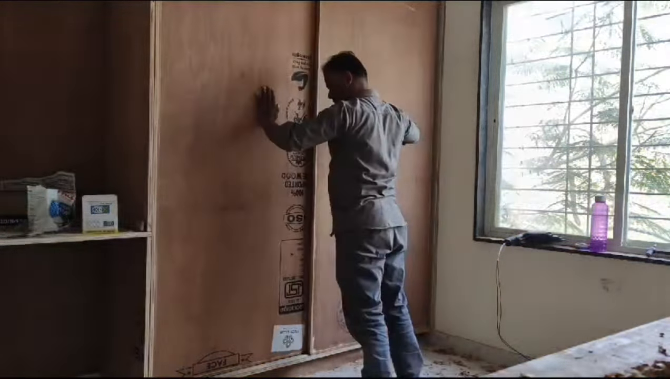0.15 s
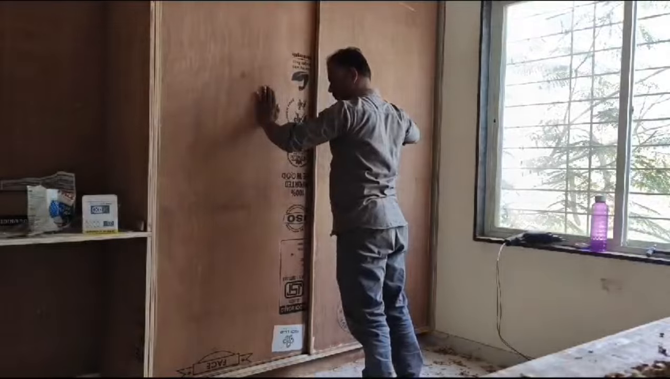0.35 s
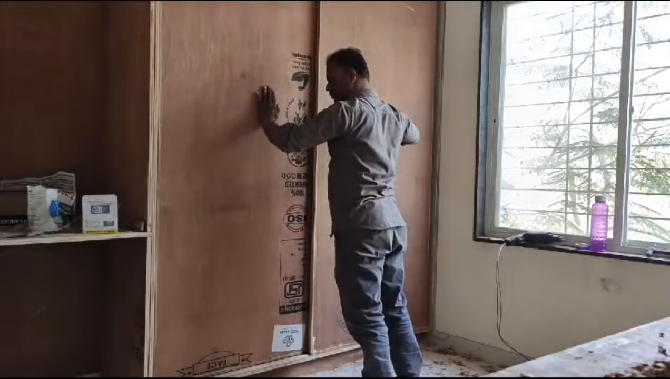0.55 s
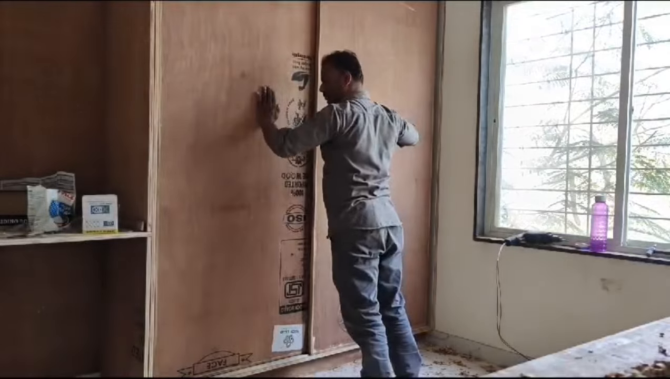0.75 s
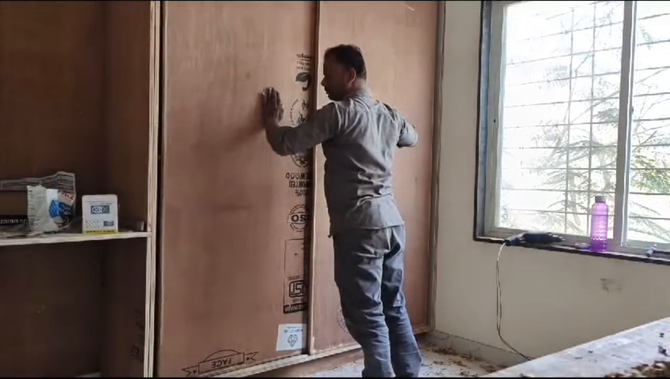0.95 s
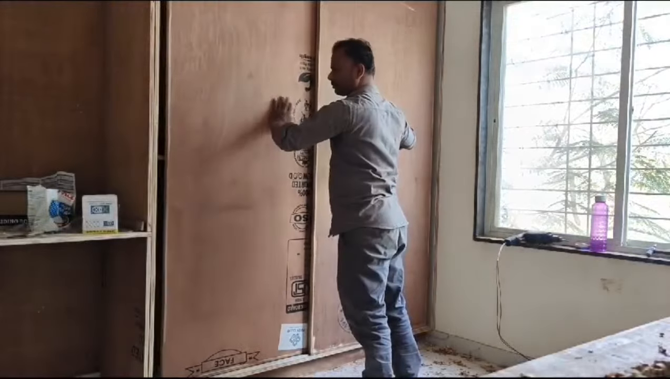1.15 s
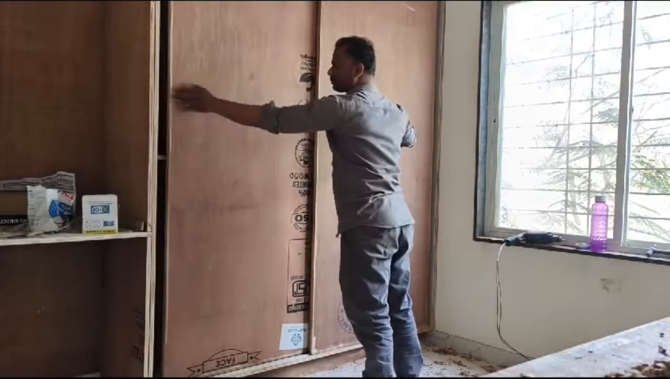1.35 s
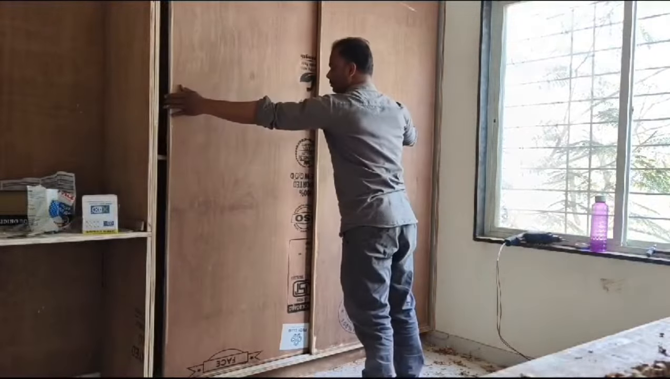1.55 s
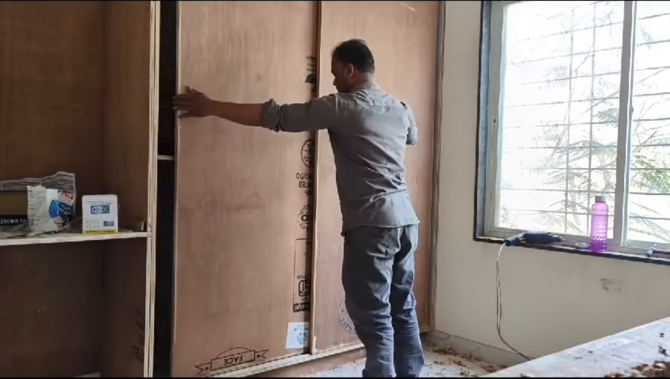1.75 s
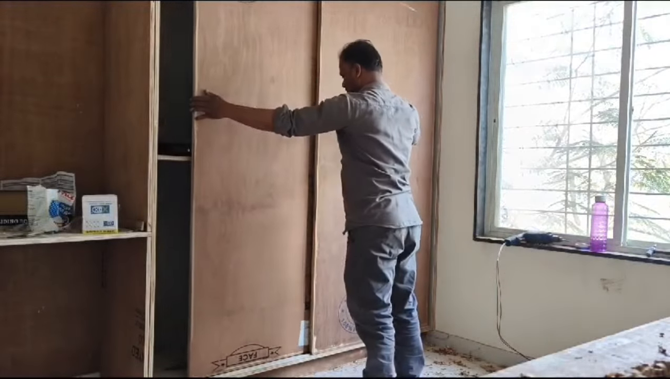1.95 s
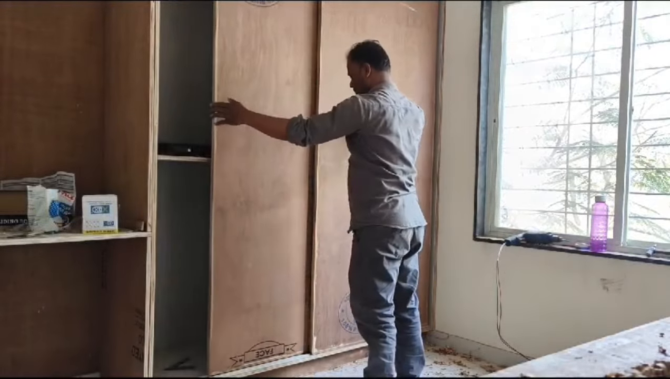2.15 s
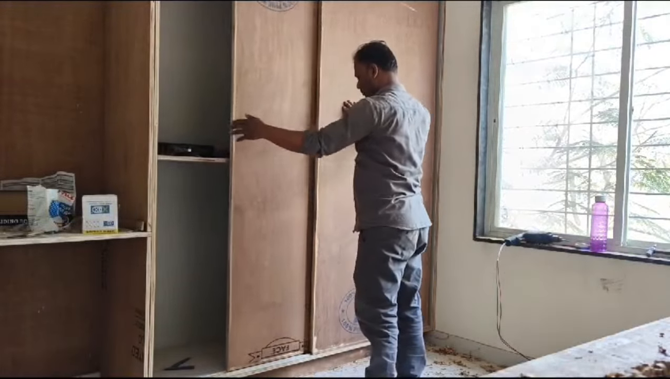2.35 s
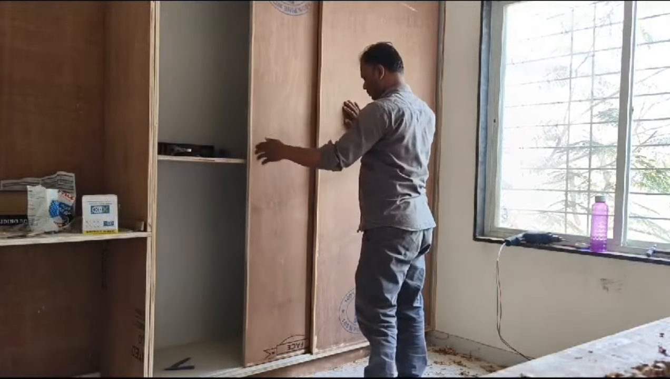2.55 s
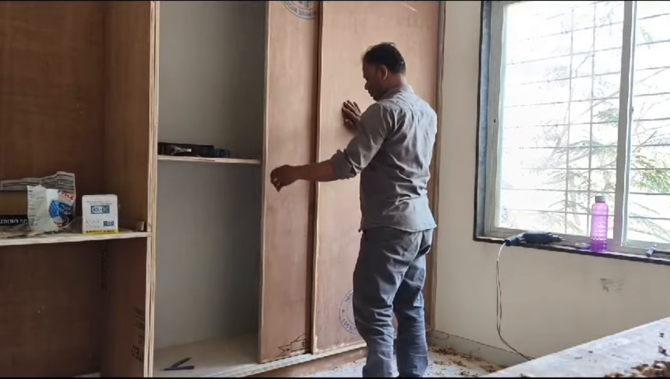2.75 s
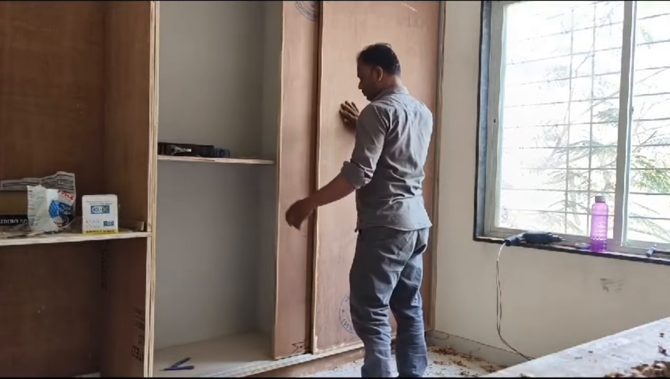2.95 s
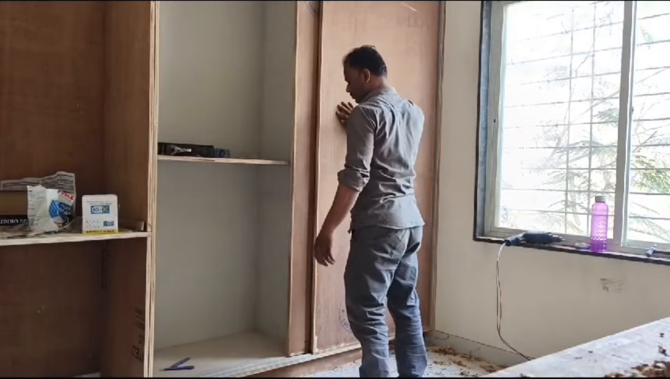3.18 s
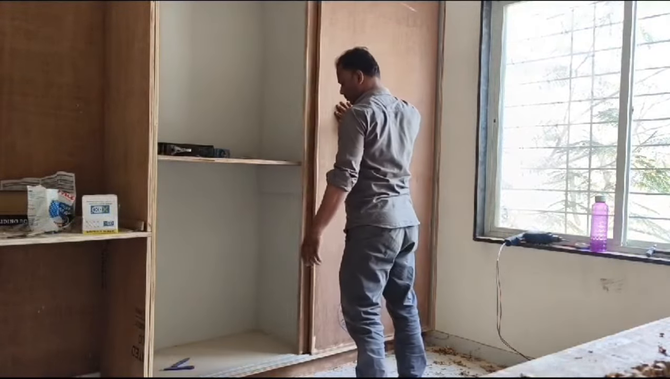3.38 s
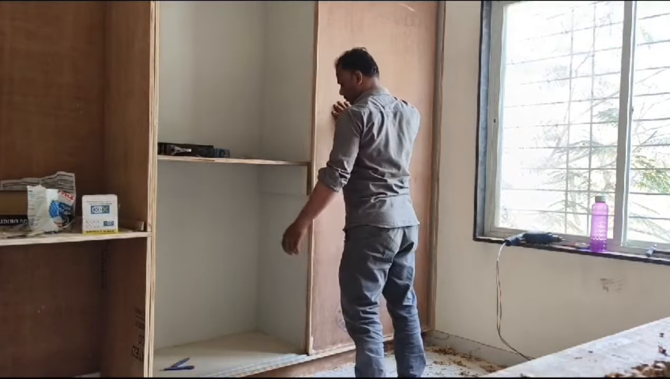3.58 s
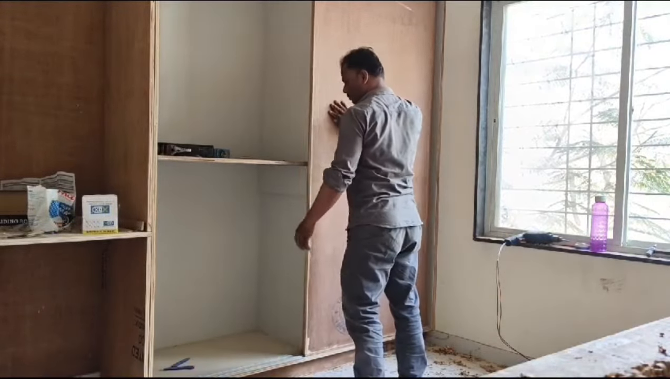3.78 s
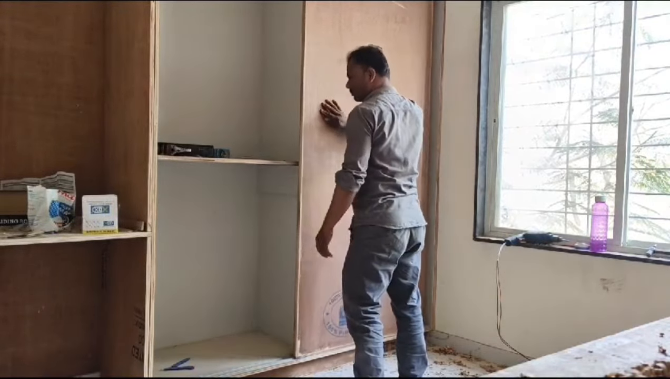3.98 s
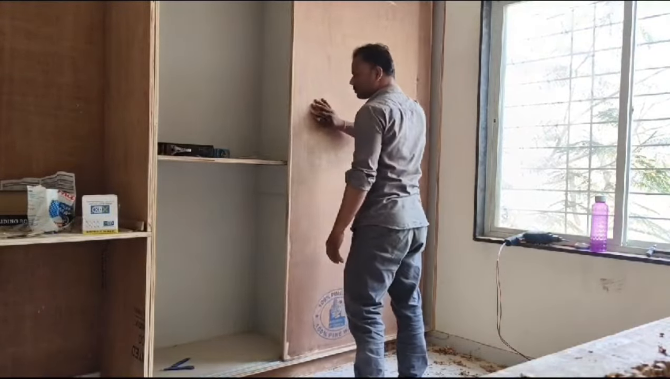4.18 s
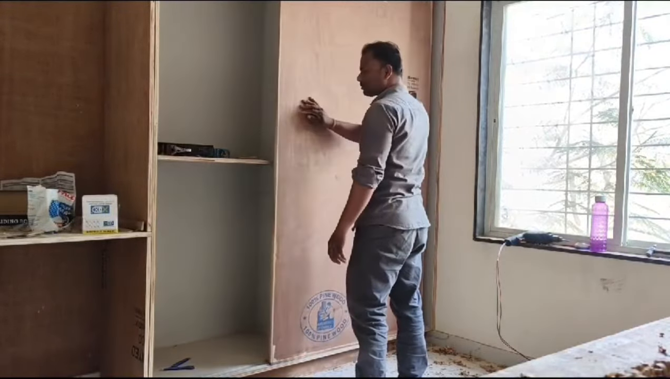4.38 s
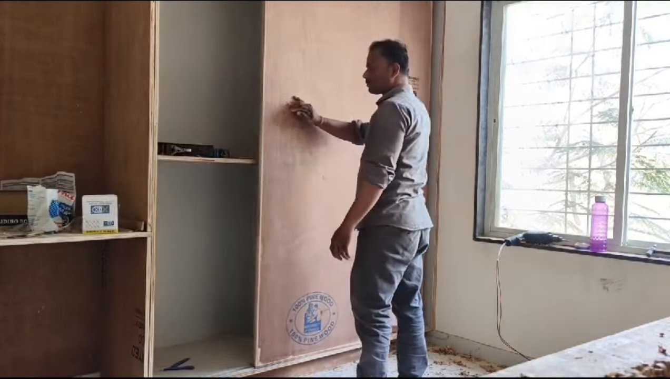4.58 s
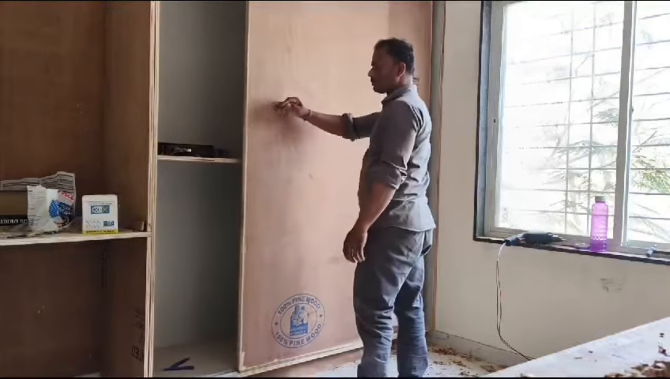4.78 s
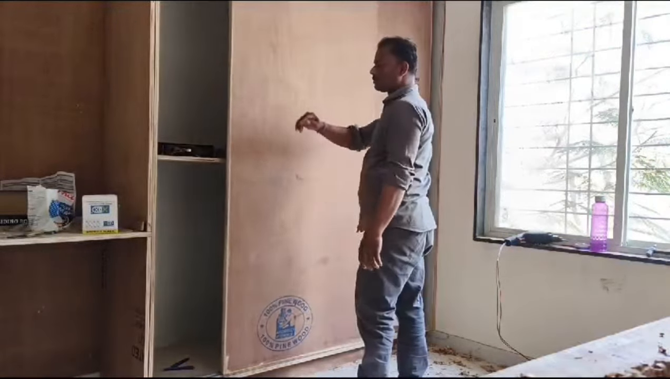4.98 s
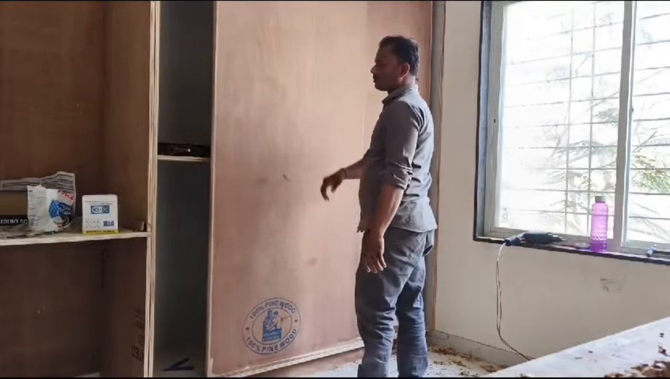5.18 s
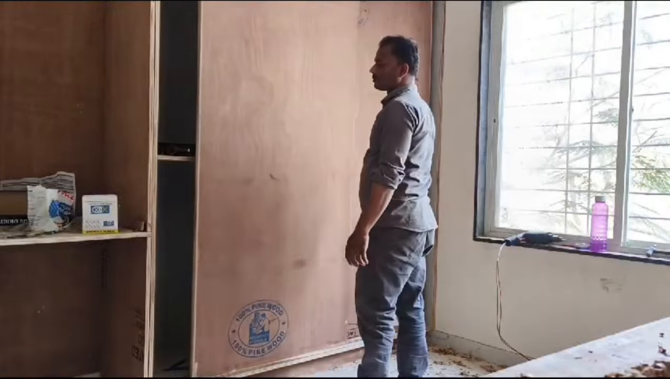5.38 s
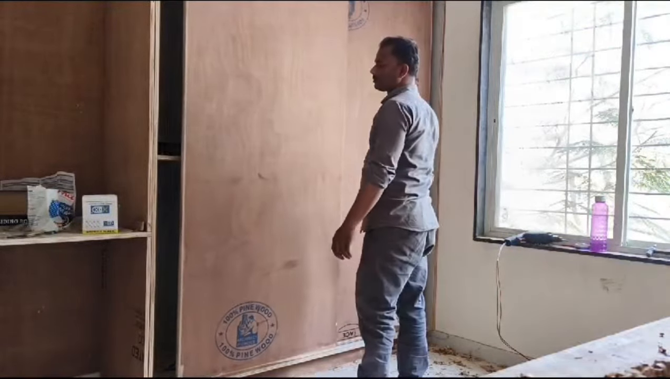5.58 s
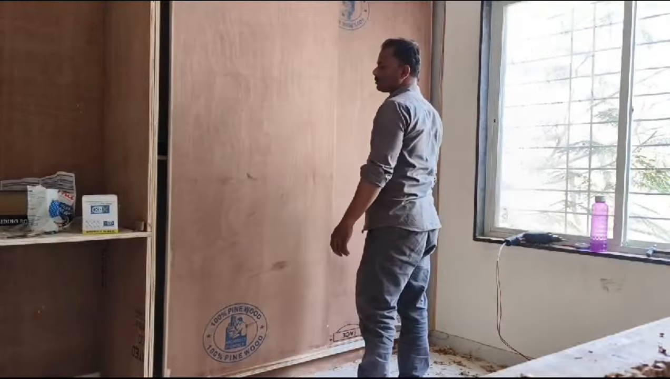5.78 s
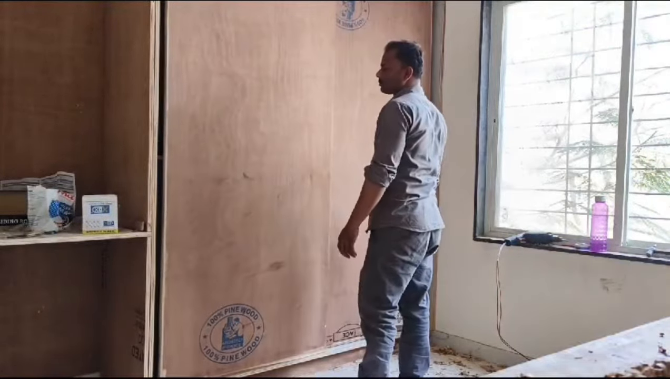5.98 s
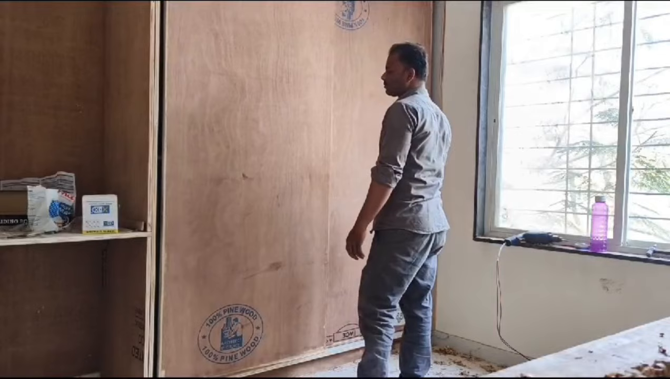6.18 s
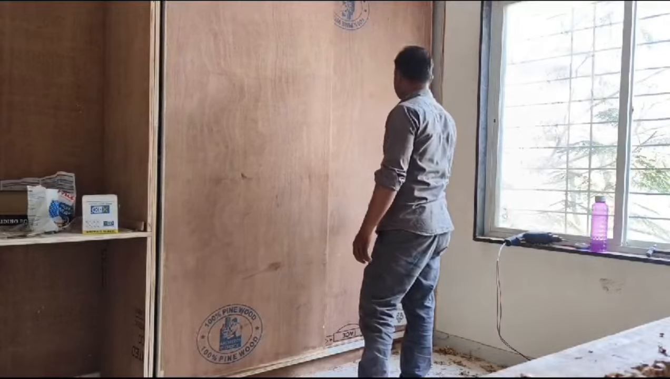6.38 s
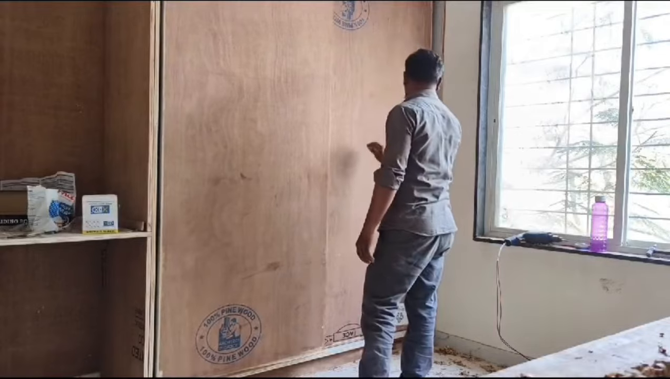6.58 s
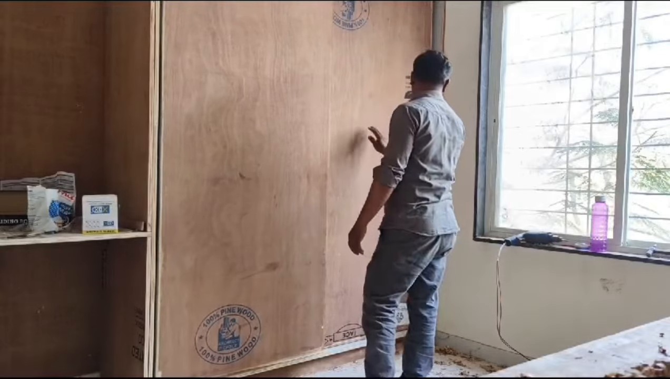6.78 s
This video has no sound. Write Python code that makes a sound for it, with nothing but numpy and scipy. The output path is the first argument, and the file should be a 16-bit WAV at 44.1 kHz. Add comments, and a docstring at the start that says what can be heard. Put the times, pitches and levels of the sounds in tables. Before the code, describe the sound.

A hard, empty room with close to a second of echo. Low rolling is audible at the start; from 0.1 to 0.6 s a small board drags across wood with a coarse, briefly singing scrape, then taps quickly two or three times until 0.7 s. Around 1.1-1.4 s there is light rattling, gritty hiss and palm brushing; two hand knocks land at 1.5 and 1.6 s over a deep rumble. The door rolls from about 2 s, hum surging, with soft bumps near 2.45 s and a firmer knock at 2.75-2.85 s, booming strongest near 2.9 s. A small thump at 3.3 s precedes the loudest wooden bang, a cluster at 3.8-4.0 s with a low ringing thud. Heavy rolling follows until 4.8 s, then fades to faint rattling and a tiny squeak at 5 s. At 6.1 s a moderate closing knock and small metal click resonate, with a brief low rumble dying away by 6.8 s.

```python
"""A bare, echoing room where plywood wardrobe doors roll along a metal track.
Uneven rollers shake the panels: filtered noise booms, drums and rattles over a wavering hum.
Grit, palms and a dragged board hiss and scrape as shaped noise, partly through ringing wood or track.
Hands, stops, board taps and a metal click are noise bursts with dying echoes; sines thud and ring on.
A deep rumble comes and goes. Two microphones hear the bass alike and the treble unlike."""
import sys
import numpy as np
from scipy import signal
from scipy.fft import rfft, irfft, next_fast_len
from scipy.io import wavfile
from scipy.ndimage import uniform_filter1d

SR = 44100
rng = np.random.default_rng(int(sys.argv[2]) if len(sys.argv) > 2 else 0)


def amp(db):
    return 10 ** (np.asarray(db, float) / 20)


def int16_out(signal):
    """Quantize to a 16-bit WAV file."""
    q = np.round(np.clip(np.atleast_2d(signal).T, -1, 1) * 32767)
    wavfile.write(sys.argv[1], SR, q.astype(np.int16))


N = 301644
T = np.arange(N) / SR
SIZE = next_fast_len(N + SR)
HZ = np.fft.rfftfreq(SIZE, 1 / SR)

# Knocks on the doors, ahead of the trims: [t/s, slap level/dB,
# slap slope above its knee/(dB per octave), push level/dB, push f/Hz]
KNOCKS = [(0.0, -50, 0.5, -39, 216), (1.514, -27, -5.5, -58, 86), (1.611, -31, -6.5, -42, 80),
          (2.423, -39, -4, -70, 80), (2.468, -44, -6, -33, 89), (2.753, -24.5, -8.5, -28.5, 780),
          (2.844, -29, -33, -30.5, 201), (3.331, -36, -6, -35.5, 81), (3.817, -36, 0.5, -24, 72.5),
          (3.86, -23.5, 1.5, -18, 101), (3.89, -20, -22.5, -28.5, 233), (3.984, -15.5, -13.5, -15.5, 480),
          (3.995, -18, -27.5, -11.5, 186), (6.099, -37.5, 1, -37, 100), (6.114, -29.5, -6, -31, 73.5),
          (6.163, -30, -6.5, -33.5, 252),]
# Door panel modes: [f/Hz, width/Hz, level over the flat path/dB]
PANEL = [(54, 20, 5.5), (80, 31, 11), (126.2, 11.6, 8), (195.7, 14.6, 9.5), (228, 16.3, 10.5),
         (418.4, 20, -3), (998, 30, -6.5), (1064, 51, 1), (1990, 480, -5), (2807, 300, -4),
         (5030, 400, 0.5)]
# Modes of the small board: [f/Hz, width/Hz, level over a flat path of gain 1/dB]
BOARD = [(340, 75, 26), (518, 86, 24.8), (1380, 410, 17.5), (2287, 116, 28.6), (2560, 240, 24.8),
         (4200, 130, 16)]
# Decay of the room's echoes: [f/Hz, t60/s]
ROOM = [(50, 0.83), (120, 0.44), (250, 1), (1000, 0.79), (2500, 0.66), (5000, 0.48), (10000, 0.32),
        (15000, 0.15)]


def evened(x):
    """Scales to rms 1."""
    return x / np.sqrt(np.mean(x ** 2) + 1e-20)


def read(points, hz):
    """Reads a table on a log-frequency axis."""
    f, value = np.transpose(points)
    return np.interp(np.log(hz + 1), np.log(f + 1), value)


def curve(rows):
    """Columns of a table over time; the ends hold."""
    s, *columns = np.transpose(rows)
    return [np.interp(T, s, column) for column in columns]


def swells(rows):
    """Summed power of smooth humps: start s, length s, peak level dB."""
    return sum(amp(2 * db) * np.sin(np.pi * np.clip((T - s) / length, 0, 1)) ** 2
               for s, length, db in rows)


def filtered(x, response):
    """Multiplies the spectrum by a response."""
    return irfft(rfft(x, SIZE) * response, SIZE)[..., :N]


def resonance(hz, width):
    """Causal response of one mode, with gain 1 at its pitch."""
    return 1 / (1 + 2j * (HZ - hz) / width)


def ringing(modes):
    """Causal response of a struck or rubbed body: a flat path plus one resonance a mode."""
    return 1 + sum(amp(db) * resonance(hz, width) for hz, width, db in modes)


def noise(colour, lumps_db=0., lump_s=.01):
    """Two unlike paths through the room, sharing one lumpy level; rms 1."""
    lumps = evened(uniform_filter1d(rng.standard_normal(N), int(lump_s * SR)))
    hiss = rng.standard_normal((2, N))
    return evened(filtered(hiss, colour) * amp(lumps_db * lumps))


def streaky(x, patchy_db):
    """Narrow resonances flare and fade at random as the contact point moves."""
    z = signal.stft(x, nperseg=512, noverlap=384)[2]
    field = rng.standard_normal(z.shape[1:])
    field = uniform_filter1d(field, 3, axis=0)  # bins
    field = evened(uniform_filter1d(field, 14, axis=1))  # frames
    patches = z * amp(patchy_db * field)
    return evened(signal.istft(patches, nperseg=512, noverlap=384)[1][:, :N])


def rolling():
    """Uneven rollers shake the panel, and one of its low modes, near 82 Hz, hums with a wavering pitch."""
    # Doors on the move: [t/s, boom level/dB, rattle level/dB]
    roll = [(0.0, -41, -47), (0.72, -94, -50), (1.2, -52.5, -43), (1.64, -47.5, -50.5), (2.0, -47.5, -52.5),
            (2.34, -41, -47), (2.89, -31.5, -45), (3.3, -40.5, -45.5), (3.83, -42, -49.5),
            (4.06, -30, -51.5), (4.38, -32.5, -53), (4.84, -44, -52), (6.06, -47, -51),
            (6.23, -38.5, -56.5), (6.84, -56, -57.5)]
    # Colours of the three noise layers ahead of the panel: [f/Hz, relative level per Hz/dB]
    boom_colour = [(50, -4.5), (70, 6), (130, 7), (170, 8.5), (500, -86)]
    drum_colour = [(70, -32), (140, -1.5), (250, 7), (380, 6), (2000, -86)]
    rattle_colour = [(200, -1.5), (400, 2.5), (1200, -0.5), (1600, -8), (3000, -16.5), (12000, -40.5)]
    # The hum surges as the rollers load the panel: [start t/s, length/s, peak level/dB]
    surges = [(1.05, 0.16, -42), (2.04, 0.35, -33), (2.43, 0.086, -35), (2.58, 0.17, -34.5),
              (2.83, 0.18, -45), (3.45, 0.27, -36.5), (6.17, 0.12, -28)]
    boom, rattle = amp(curve(roll))
    drum = boom * amp(-7.5)
    hum = np.sqrt((boom * amp(-24.5)) ** 2 + swells(surges))
    panel = ringing(PANEL)

    waver = evened(uniform_filter1d(rng.standard_normal(N), 2000))
    hum_hz = 82 * (1 + 0.085 * waver)
    out = boom * noise(amp(read(boom_colour, HZ)) * panel)
    out += np.sqrt(2) * hum * np.sin(2 * np.pi * np.cumsum(hum_hz) / SR)
    out += drum * noise(amp(read(drum_colour, HZ)) * panel)
    shaking = noise(amp(read(rattle_colour, HZ)) * panel, lumps_db=0.96, lump_s=.04)
    return out + rattle * streaky(shaking, patchy_db=2.5)


def grit_and_palms():
    """Grit under the rollers hisses, partly through the ringing track; palms brush the wood."""
    # Grit hiss: [t/s, level/dB]
    grit = [(1.04, -91), (1.09, -53.5), (1.55, -54.5), (1.72, -63), (1.9, -80), (1.97, -57.5), (2.3, -58.5),
            (2.95, -69), (3.25, -58.5), (3.6, -71), (3.77, -62.5), (4.45, -79), (4.9, -70.5), (5.4, -77),
            (5.6, -66), (6.05, -66), (6.4, -81.5)]
    # Part of the grit's power that rings in the track: [t/s, share 0-1]
    on_track = [(1.8, 0.03), (1.95, 0.76), (2.8, 1)]
    # Palms brushing wood: [start t/s, length/s, peak level/dB]
    palms = [(1.1, 0.23, -51), (1.31, .17, -46), (2.97, 0.15, -58), (3.27, 0.15, -54), (3.62, 0.15, -62),
             (4.95, 0.21, -64)]
    # Colour of the hiss: [f/Hz, relative level per Hz/dB]
    hiss_colour = [(1000, 11.5), (3000, 12), (8000, 3), (11500, -4), (14500, 2.5), (16000, -29.5)]
    # Track modes: [f/Hz, width/Hz, level over the flat path/dB]
    track = [(3660, 35, 3), (10440, 350, 8.5)]
    hiss = amp(curve(grit)[0]) * (T > grit[0][0])
    share = curve(on_track)[0]
    colour = amp(read(hiss_colour, HZ))
    direct = np.sqrt(hiss ** 2 * (1 - share) + swells(palms))
    out = direct * noise(colour, lumps_db=1.0, lump_s=0.007)
    return out + hiss * np.sqrt(share) * streaky(noise(colour * ringing(track)), patchy_db=3.5)


def scrape():
    """The small board drags across wood, and friction noise passes through its modes."""
    # The drag: [t/s, level/dB]
    drag = [(0.11, -57.5), (0.16, -42.5), (0.25, -36), (0.32, -35), (0.42, -42.5), (0.47, -47.5),
            (0.6, -60)]
    # Colour of the friction: [f/Hz, relative level per Hz/dB]
    friction = [(300, 1.5), (1000, 5), (1800, 5.5), (3500, -4.5), (9500, -25.5), (13000, -39)]
    level = amp(curve(drag)[0]) * (T < drag[-1][0])
    board = ringing(BOARD) + 24.0  # a stronger flat path softens the modes
    rub = noise(amp(read(friction, HZ)) * board, lumps_db=1.0, lump_s=0.015)
    return level * streaky(rub, patchy_db=2.0)


def sings():
    """Rubbing sings briefly in one resonance of board, track or panel: narrow noise swells."""
    # Singing: [start t/s, length/s, peak level/dB, f/Hz, width of each of two cascaded resonances/Hz]
    songs = [(0.28, 0.18, -43.5, 960, 27), (0.12, 0.27, -56, 4900, 230), (1.89, .3, -72.5, 8950, 150),
             (1.83, 0.85, -69, 5900, 120), (5, .22, -58, 1090, 60)]
    out = np.zeros((2, N))
    for *swell, hz, width in songs:
        out += np.sqrt(swells([swell])) * noise(resonance(hz, width) ** 2)
    return out


def blow_db(hz, slap_db, slope_db, push_db, push_hz):
    """Level of a blow at one pitch: a hard slap over a soft low push."""
    up, off = np.log2(hz / 867), np.log2(hz / push_hz)  # octaves from the slap's knee and the push
    # above the knee the slope steepens with each octave; below it the slap falls 13 dB per octave
    slap = slap_db + ((slope_db - 1.0 * up) * up if up > 0 else 13 * up)
    push = push_db + (-8.5 * off if off > 0 else 9.5 * off)
    return 10 * np.log10(amp(2 * slap) + amp(2 * push))


def struck(blows, modes, trim_db, crack_db):
    """Each blow cracks, then fills the room, whose echoes die band by band; the struck body colours it."""
    # First sound over the room tail, ahead of crack_db and the growth: [f/Hz, level/dB]
    crack_colour = [(250, 15.5), (1000, 16), (4000, 20.5), (12000, 12)]
    echoes = rfft(rng.standard_normal((2, SIZE)))
    out = np.zeros((2, N))
    octave = np.log2(HZ + 1)
    for centre in np.arange(5.5, 14.5, .75):
        hz, power = 2 ** centre, np.zeros(N)
        swing = 2.1 / hz  # bass swells over a few cycles
        for s, *blow in blows:
            start = round(s * SR)
            t = T[:min(N - start, SR)]
            # decays of power: -120 in amp() is 60 dB of level
            tail = (1 - np.exp(-(t / (0.015 + swing)) ** 2)) * amp(-120 * t / read(ROOM, hz))
            crack = (1 - np.exp(-(t / (0.0009 + swing)) ** 2)) * amp(-120 * t / 0.1)
            # harder slaps crack more: 0.44 dB per dB
            over_db = read(crack_colour, hz) + crack_db + 0.44 * blow[0]
            power[start:start + len(t)] += amp(2 * blow_db(hz, *blow)) * (tail + amp(2 * over_db) * crack)
        band = np.cos(np.clip((octave - centre) / .75, -1, 1) * np.pi / 2)
        out += np.sqrt(power) * evened(irfft(echoes * band / np.sqrt(HZ + 1), SIZE)[:, :N])
    return amp(trim_db) * filtered(out, ringing(modes))


def door_knocks():
    """Hands and stops knock the door panels, whose modes colour the burst."""
    return struck(KNOCKS, PANEL, trim_db=-11.0, crack_db=0.6)


def thuds():
    """Heavy blows set the panel modes swinging freely, as dying sines."""
    out = np.zeros((2, N))
    for s, *blow in KNOCKS:
        start = round(s * SR)
        t = T[:min(N - start, SR)]
        for hz, _, db in PANEL:
            tilt_db = -2 * np.log2(hz / 200)  # free swing weakens by 2 dB each octave
            t60 = 0.51 * read(ROOM, hz)
            swing = amp(db + blow_db(hz, *blow) + tilt_db - 60 * t / t60)
            rise = 1 - np.exp(-t * hz / 0.39)
            out[:, start:start + len(t)] += swing * rise * np.sin(2 * np.pi * hz * t)
    return amp(-11.0) * out


def rings():
    """Notes ring on in the wood: close modes start together, then beat as they die."""
    # Notes: [start t/s, f/Hz, level ahead of rise and decay/dB, t60 ahead of a half-second fade/s]
    notes = [(0.0, 788, -38, 0.18), (1.072, 1980, -46.5, 0.59), (1.08, 777, -44, 0.32),
             (1.169, 1253, -45, 0.96), (1.516, 1085, -31.5, 0.39), (1.612, 848, -35, 0.35),
             (0.711, 341, -37.5, .5), (2.759, 412, -27.5, 0.32), (3.861, 4520, -31, 0.36),
             (3.987, 2200, -19, 0.059), (3.997, 195.9, -11.5, 0.49), (6.105, 1925, -46, 1),
             (6.11, 1043, -35, 1)]
    out = np.zeros((2, N))
    draws = rng.uniform(-1, 1, (len(notes), 2, 2, 16, 1))  # pitch or phase, path, mode
    for (s, hz, db, t60), (apart, turn) in zip(notes, draws):
        start = round(s * SR)
        t = T[:min(N - start, SR // 2)]
        mode_hz = hz * (1 + .08 * apart)
        note = np.sin(2 * np.pi * mode_hz * t + np.pi * turn).sum(1) / np.sqrt(8)
        shape = (1 - np.exp(-t / 0.0043)) * np.sqrt(1 - 2 * t)
        out[:, start:start + len(t)] += amp(db - 60 * t / t60) * shape * note
    return out


def board_taps():
    """The small board taps: short blows ring its own modes."""
    # Taps, ahead of the trim: [t/s, slap level/dB]
    taps = [(0.619, -38), (0.637, -37.5), (0.697, -40.5)]
    # Shared by all taps, ahead of the trim: [slope/(dB per octave), push level/dB, push f/Hz]
    tap_colour = (-5.5, -52, 91)
    blows = [(s, db, *tap_colour) for s, db in taps]
    return struck(blows, BOARD, trim_db=-17.5, crack_db=3.0)


def metal_click():
    """A small metal part clicks as the door shuts: one blow on high modes."""
    # The blow, ahead of the trim: [t/s, slap level/dB, slope/(dB per octave), push level/dB, push f/Hz]
    click = (6.113, -51, 1.5, -84.5, 101)
    # Modes of the metal: [f/Hz, width/Hz, level over the flat path/dB]
    metal = [(7550, 1600, 9), (13800, 330, 27), (14600, 540, 17)]
    return struck([click], metal, trim_db=-3.5, crack_db=10.0)


def rumble():
    """A deep rumble comes and goes: noise through two cascaded low resonances."""
    # Rumble: [t/s, level/dB]
    deep = [(0.0, -41.5), (.75, -54), (1.7, -35.5), (2.2, -66), (6.84, -50)]
    return amp(curve(deep)[0]) * noise(resonance(49, 36) ** 2)


def scene():
    """Mid and side paths of the room's sound."""
    rubbing = grit_and_palms() + scrape() + sings()
    blows = door_knocks() + thuds() + rings() + board_taps() + metal_click()
    return rolling() + rubbing + blows + rumble()


def low_pass(x):
    """Removes everything above the highest recorded frequency."""
    return signal.sosfilt(signal.butter(12, 15700, fs=SR, output="sos"), x)


def record(dry):
    """The microphone pair: side weak in the bass, right brighter, then a low cut."""
    # Side filter, a width that grows with pitch: [f/Hz, level/dB]
    side_colour = [(60, -21), (150, -23), (380, 0.5), (950, 3.5), (15000, -1.5)]
    # Left over right microphone: [f/Hz, level/dB]
    left_over_right = [(60, -1.5), (2380, 0), (15000, -9.5)]
    mid, unlike = dry
    # sound reaches the left microphone later, which makes a share of the side path
    lag_s, share = .0005, 0.34
    late = filtered(mid, -1j * np.sqrt(2) * np.sin(2 * np.pi * HZ * lag_s))
    side = share * late + np.sqrt(1 - share ** 2) * unlike
    side = filtered(side, amp(read(side_colour, HZ)))

    tilt = amp(read(left_over_right, HZ) / 2)
    low_cut = signal.freqs(*signal.butter(9, 43., "high", analog=True), HZ)[1]
    left = filtered(mid + side, tilt * low_cut)
    right = filtered(mid - side, low_cut / tilt)
    return low_pass(np.array([left, right]))


dry = scene()
out = record(dry)
int16_out(out)
```